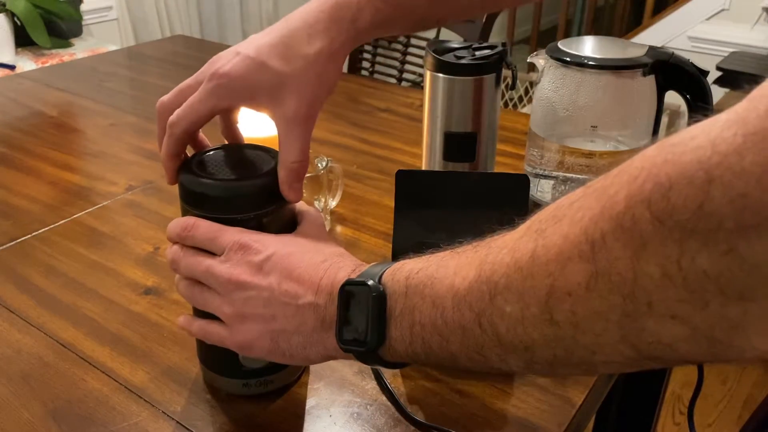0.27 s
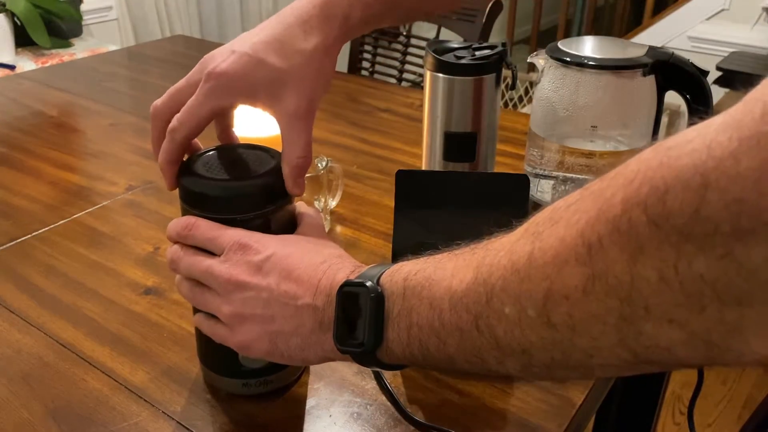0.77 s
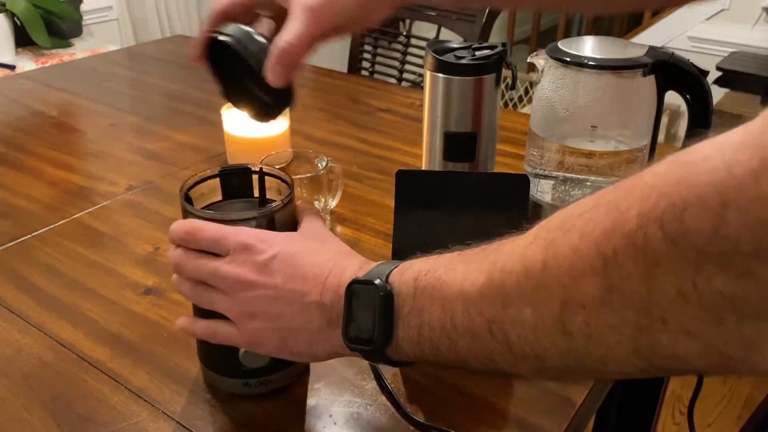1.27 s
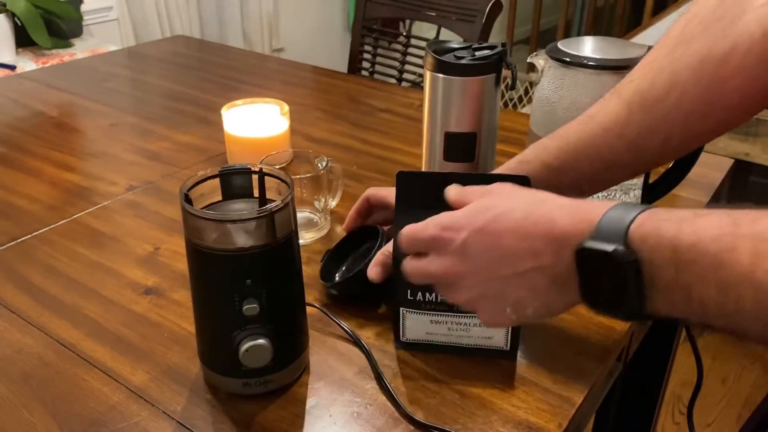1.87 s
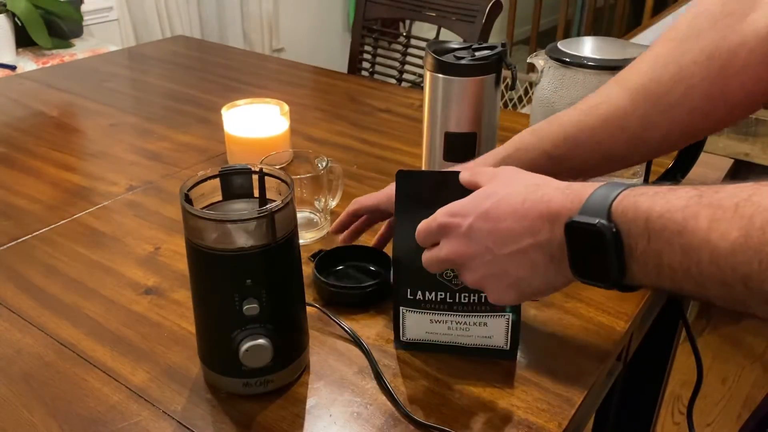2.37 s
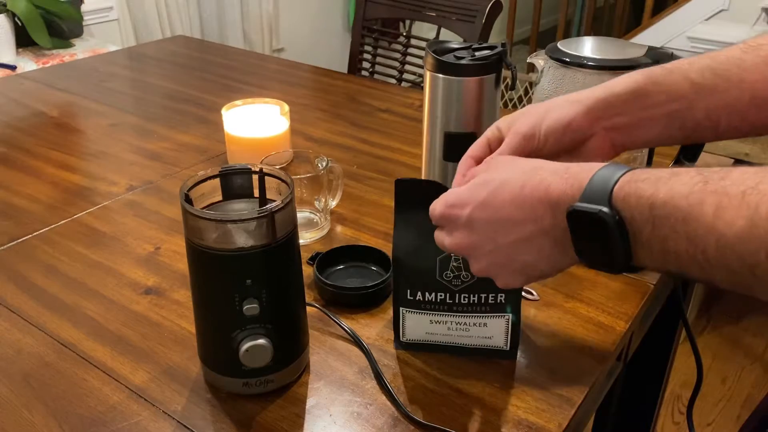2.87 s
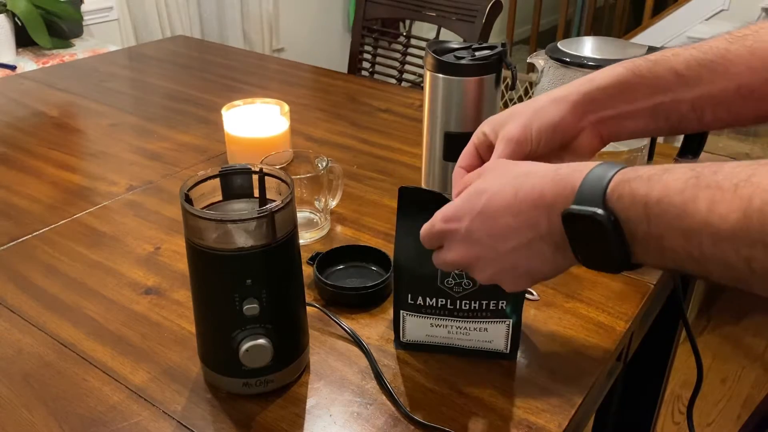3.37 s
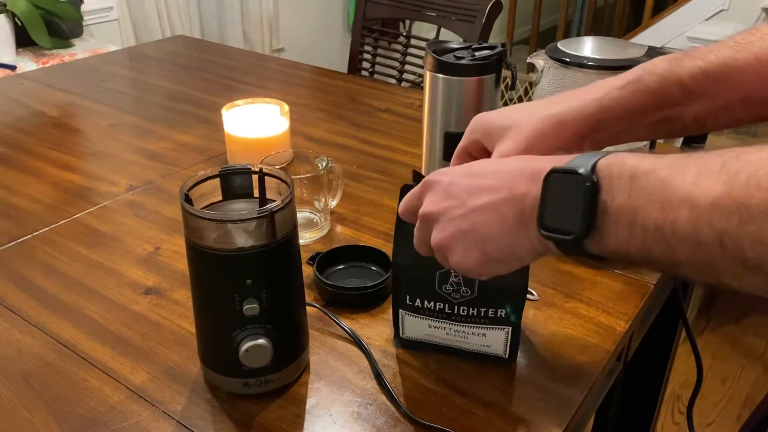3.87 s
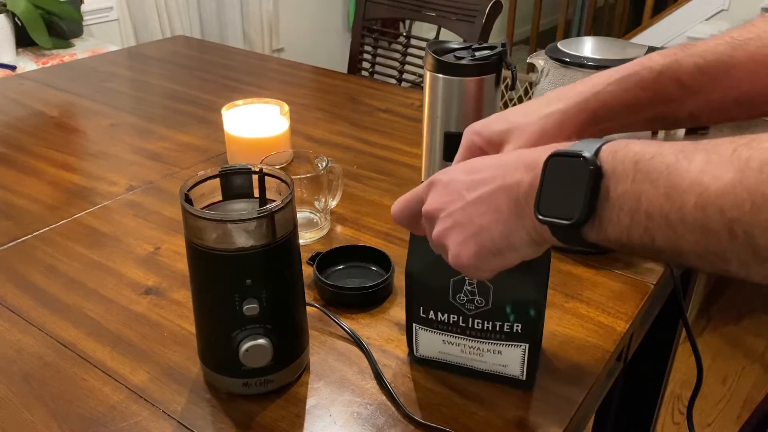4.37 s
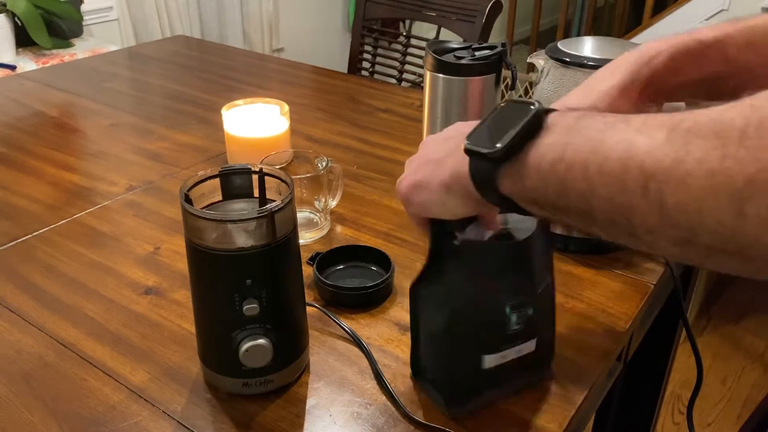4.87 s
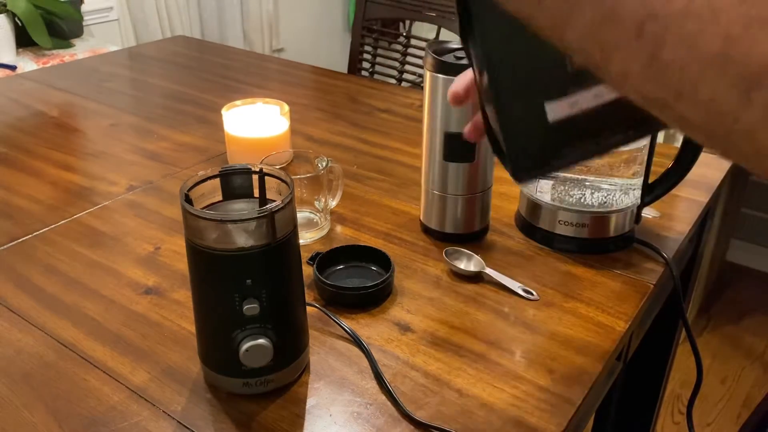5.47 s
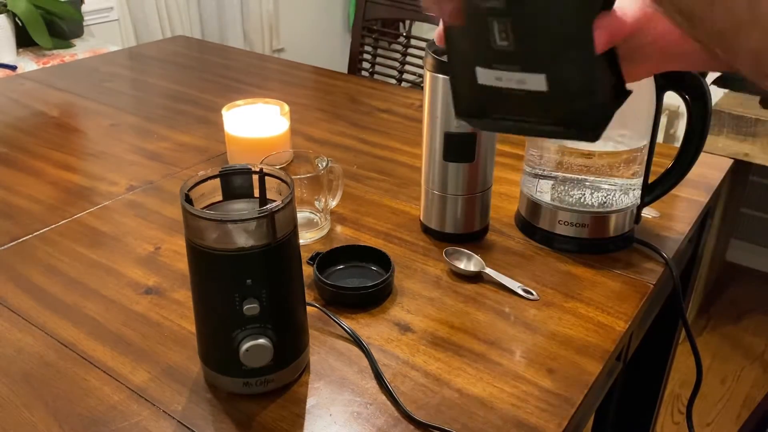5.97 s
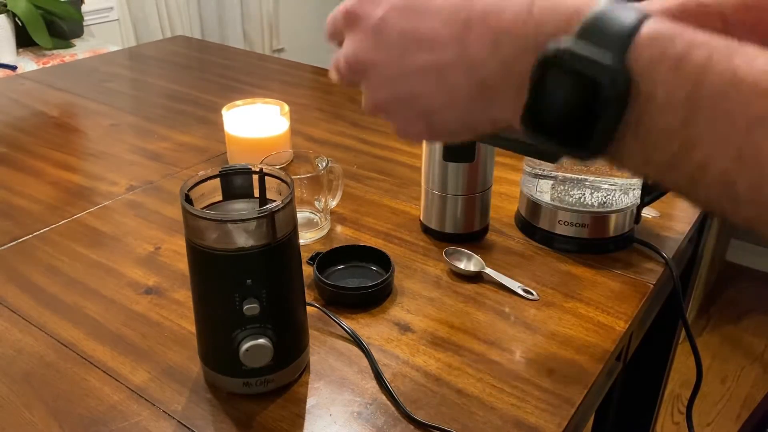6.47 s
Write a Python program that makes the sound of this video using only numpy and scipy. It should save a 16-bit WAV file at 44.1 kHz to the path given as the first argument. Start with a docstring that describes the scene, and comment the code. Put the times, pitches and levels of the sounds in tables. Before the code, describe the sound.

Plastic lid rubbing, popping off and sliding on a table, followed by a crackling foil bag with coffee beans shifting inside.

```python
"""Grinder lid and coffee beans

At a wooden table, the plastic lid of a coffee grinder rubs in its rim and clicks free. It is set down
with a clack and slid aside, sticking and slipping. A foil bag of coffee beans is opened and lifted:
its creases rustle and its panels buckle with sharp snaps while the beans shift inside.
A small kitchen echoes each sound, over a low appliance hum."""
import sys
import numpy as np
from scipy import signal
from scipy.fft import rfft, irfft, next_fast_len
from scipy.io import wavfile
from scipy.ndimage import uniform_filter1d, map_coordinates

SR = 44100
rng = np.random.default_rng(int(sys.argv[2]) if len(sys.argv) > 2 else 0)


def store_wav(level_fs):
    """Save 16-bit WAV to argv[1]."""
    pcm = np.round(np.clip(np.atleast_2d(level_fs), -1, 1) * 32767)
    wavfile.write(sys.argv[1], SR, pcm.T.astype(np.int16))


N = 296793

# Levels in the tables are relative: the functions scale them further.
# A "colour" is the balance of low and high notes. Each row: frequency in Hz, level in dB.
RUMBLE_COLOUR = [(20, -33.5), (40, -14), (65, -1.5), (95, -11.5), (200, -17.5), (300, -23), (550, -33.5),
                 (1400, -49.5), (16000, -66.5)]
RUB_COLOUR = [(150, -15), (400, 0.5), (1000, 8.5), (1800, 0), (3200, -4.5), (6500, -5), (10000, -9),
              (14500, -9)]
THUD_COLOUR = [(60, -17), (300, 5.5), (560, 7.5), (950, -2), (3000, -36.5)]  # a snap's hollow thud
BODY_COLOUR = [(150, -40.5), (500, -12), (1250, -3.5), (2800, -7), (6000, -21.5), (15000, -48.5)]  # the panel that snaps
SIZZLE_COLOUR = [(500, -33.5), (1250, -10.5), (3100, 0), (7000, -3.5), (15000, -11.5)]  # the crease of a snap
SLIDE_COLOUR = [(100, -11.5), (290, -3.5), (370, 3.5), (700, 3), (1100, -1.5), (1600, -6), (2100, -8),
                (2500, -23), (4000, -17.5), (7000, -35), (14000, -46.5)]
FOIL_COLOUR = [(150, -16), (400, -5), (1100, -11.5), (2500, 4), (6000, -1.5), (9000, -1.5), (12500, -8.5),
               (14500, -2)]
BEAN_COLOUR = [(150, -6), (400, -3), (900, -4.5), (1500, -2), (2500, -7.5), (5000, -16.5), (12000, -33)]
ECHO_COLOUR = [(100, -1.5), (400, -5.5), (1200, -0.5), (3000, -3), (6000, -1.5), (10000, -1.5),
               (15000, -11)]
# The appliance's tones. Each row: pitch in Hz, level in dB.
HUM_TONES = [(60, -63), (150, -67.5), (205, -69)]
# The lid rubbing in the rim, one list for each stroke. Each row: time in seconds, level in dB.
RUB_STROKES = [
    [(0, -56.5), (.05, -66.5), (.135, -64)],
    [(.358, -57), (.39, -71), (.48, -61), (.507, -65)],
    [(.6, -67.5), (.636, -82.5)],
    [(.715, -65), (.809, -51)],
    [(1.366, -73), (1.412, -68)],
    [(2.06, -68), (2.09, -59.5), (2.27, -71)],
]
# Notes the lid boosts. Each row: frequency in Hz, width in Hz, boost in dB.
EDGE_PEAKS = [(2950, 300, 5), (3650, 220, 7), (4480, 220, 11), (5850, 240, 8)]  # at its edge
SLIDE_PEAKS = [(386, 31, 5.5), (810, 70, 4.5), (1140, 35, 7.5), (1543, 28, 7), (1995, 130, 7.5)]  # lying on the wood
# Snaps. Each row: start in seconds, level in dB, ring in Hz, thud and sizzle in dB against the body.
LID_CLICKS = [(0.8093, -29.5, 6260, -19.5, -3), (1.0292, -62.5, 4540, 0, 11), (2.089, -52.5, 1400, -14, -6),
              (2.099, -46.5, 1450, -27, -9)]  # the lid leaves the rim and fingers touch it
BAG_SNAPS = [(2.7532, -49, 1800, -14, -7), (2.8414, -48.5, 477, 3.5, 1.5), (3.2637, -45, 296, 7, -20),
             (3.3324, -32.5, 2900, -6, -15), (3.4056, -46.5, 1910, 2, 2), (3.4622, -47, 2230, 2, -5),
             (3.6762, -31.5, 2430, -5, -2.5), (3.7034, -36.5, 388, 3, -15), (3.7259, -34, 556, -7, -16),
             (3.7813, -35, 1500, -32.5, -39), (3.7949, -27, 3040, -8.5, -3.5),
             (3.8472, -31.5, 1660, -1.5, -5), (3.8612, -25.5, 1370, -4.5, 3.5), (3.9048, -31, 3200, 4, -15),
             (4.1385, -32, 3530, -21, -7), (4.145, -28, 1400, 0.5, -10.5),
             (4.4213, -22.5, 1190, -14, -10.5), (4.4494, -27.5, 2550, 0, -1),
             (4.4981, -37.5, 1300, 1.5, -5.5), (4.6925, -37.5, 304, 0, -40), (4.908, -46, 1900, -1, -28),
             (5.2178, -30.5, 1710, -24, -1), (5.3132, -46.5, 1180, -19, -29),
             (5.3845, -41.5, 2600, -12, -6), (5.3905, -36.5, 1560, -13, -13),
             (5.6264, -32.5, 1510, -7, -19), (5.6496, -28.5, 1620, -1.5, -14.5),
             (5.6847, -28, 1540, -3.5, -3), (5.7458, -32.5, 1890, -8, -2.5), (5.7859, -30, 1970, 3.5, 1),
             (5.9107, -40.5, 900, -3, -23), (6.1215, -34.5, 1640, -25, -23), (6.1583, -32, 2420, -2, -2),
             (6.1709, -23.5, 5600, -4, 2.5), (6.3133, -38, 1580, -21, -13.5), (6.5425, -35, 1650, -3.5, -9)]  # panels of the bag buckle
# The lid's notes, alone and on the table. Each row: pitch in Hz, level in dB, seconds to fade by 60 dB.
LID_NOTES = [(140, -16, .16), (365, -21, .3), (410, 4, .05), (465, -2, .08), (750, -15, .5), (840, -5, .1),
             (1112, 4, .085), (3500, -12, .025), (4540, -39, .42), (6410, -23, .13), (14170, -31, .11)]
# The lid landing and rocking. Each row: start in seconds, strength in dB.
LID_BLOWS = [(1.7762, -21), (1.7794, -15.5), (1.7977, -28), (1.803, -28), (1.886, -35.5)]
# The push on the sliding lid. Each row: time in seconds, force in dB.
LID_PUSH = [(2.272, -40), (2.345, -31), (2.46, -37), (2.54, -31.5), (2.61, -48)]
# Five hand movements: feel for the seal, grip it, pull it open, lift the bag, change grip.
# Each row: time in seconds, foil rustle in dB, bean shifting in dB.
HAND_MOVES = [
    [(2.69, -63.5, -52), (2.8, -64, -69), (2.97, -61.5, -101), (3.005, -78, -97.5), (3.033, -51, -88),
     (3.07, -68.5, -86), (3.18, -60.5, -71.5), (3.23, -80, -59)],
    [(3.275, -54.5, -62), (3.32, -59, -65), (3.5, -59.5, -62), (3.53, -61.5, -83), (3.63, -62.5, -85)],
    [(3.68, -68, -51), (3.9, -56.5, -103), (4.13, -58.5, -56), (4.22, -55, -64.5), (4.42, -83, -53),
     (4.55, -61.5, -58), (4.76, -57, -57.5), (4.87, -54.5, -59), (4.945, -75, -87)],
    [(5.085, -61.5, -61.5), (5.16, -73.5, -83.5), (5.21, -51, -48.5), (5.3, -81, -57.5), (5.385, -53, -64),
     (5.47, -68, -57.5), (5.55, -66, -49.5), (5.66, -50, -49.5), (5.87, -55.5, -52)],
    [(6.0, -61, -46.5), (6.05, -53, -53.5), (6.25, -76, -45.5), (6.35, -56.5, -59), (6.53, -81, -62)],
]
# The bag's base hitting the table. Each row: start in seconds, level in dB, pitch in Hz.
BAG_BUMPS = [(3.221, -40.5, 316), (4.192, -31.5, 164), (4.21, -39, 57), (4.257, -33, 430),
             (4.35, -38.5, 520)]
# How long the kitchen rings. Each row: frequency in Hz, seconds to fade by 60 dB.
ECHO_FADE = [(150, 0.86), (500, 0.6), (1200, 0.53), (3000, 0.45), (6000, 0.34), (10000, 0.28),
             (15000, 0.015)]
# How alike room sound is on the left and right. Each row: frequency in Hz, likeness (1 is the same).
STEREO_LIKENESS = [(60, 1), (200, 0.8), (500, 0.072), (1200, 0.023), (3000, 0.088), (7000, 0.44)]
# Frequencies in Hz. From each to the next, the right side's treble shifts by half a cycle more.
PHASE_TURNS_HZ = [7000, 8500, 10100, 12300, 14100, 16500]


def amp(db):
    """Turn decibels into a gain to multiply by."""
    return 10 ** (np.asarray(db) / 20)


def unit(x):
    """Scale x to an average (rms) level of 1."""
    return x / np.sqrt(np.mean(x ** 2) + 1e-20)


def along(points, hz):
    """Read between (Hz, value) points on a pitch scale."""
    freqs, values = np.transpose(points)
    return np.interp(np.log(hz + 1), np.log(freqs + 1), values)


def level(rows):
    """A gain for each sample from (seconds, dB) rows, silent outside them."""
    s, db = np.reshape(rows, (-1, 2)).T
    return amp(np.interp(np.arange(N) / SR, s, db, left=-120, right=-120))


def movements(curves, edge_s):
    """Add up the level curves of hand movements, each easing in and out."""
    width = max(round(edge_s * SR), 1)
    return uniform_filter1d(uniform_filter1d(sum(level(curve) for curve in curves), width), width)


def wobble(rate):
    """A smooth random curve with `rate` new values a second."""
    return map_coordinates(rng.standard_normal(int(N * rate / SR) + 4), [np.arange(N) * rate / SR])


def filtered(x, response):
    """Multiply each frequency in x by response(hz)."""
    size = next_fast_len(N + SR // 2)
    return irfft(rfft(x, size) * response(np.fft.rfftfreq(size, 1 / SR)), size)[..., :N]


def coloured(x, points):
    """Give x a colour, at level 1."""
    return unit(filtered(x, lambda hz: amp(along(points, hz))))


def resonant(x, peaks):
    """Boost the notes at which an object likes to ring."""
    def response(hz):
        return 1 + sum((amp(db) - 1) / (1 + 2j * (hz - f) / width) for f, width, db in peaks)
    return unit(filtered(x, response))


def shifting(x, depth_db):
    """Keep changing the colour of x, as when the point of contact moves."""
    spectra = signal.stft(x, nperseg=256)[2]
    drift = uniform_filter1d(rng.standard_normal(spectra.shape), size=10, axis=0)
    drift = unit(uniform_filter1d(drift, size=10, axis=1))
    return unit(signal.istft(spectra * amp(depth_db * drift), nperseg=256)[1][:N])


def causal(gain):
    """A filter with this gain that starts at once and then rings out."""
    cepstrum = irfft(np.log(gain + 1e-6))
    half = len(cepstrum) // 2
    cepstrum[1:half] *= 2
    cepstrum[half + 1:] = 0
    return np.exp(rfft(cepstrum))


def add(track, s, sound):
    """Mix a sound in, starting at s seconds."""
    part = track[..., round(s * SR):][..., :sound.shape[-1]]
    part += sound[..., :part.shape[-1]]


def grains(rate, spread_db):
    """Tiny random ticks of uneven size, about `rate` a second."""
    size = amp(spread_db * np.minimum(rng.exponential(size=N), 3))
    return unit((rng.random(N) < rate / SR) * size * rng.choice([-1, 1], N))


def diffuse(pair, hz):
    """Blend two unrelated spectra into left and right, alike in the bass."""
    turn = np.arccos(np.clip(along(STEREO_LIKENESS, hz), -1, 1)) / 2
    mid, side = pair[0] * np.cos(turn), pair[1] * np.sin(turn)
    return np.array([mid + side, mid - side])


def rumble_and_hum():
    """Low room rumble and a slightly unsteady appliance hum."""
    t, hz = np.arange(N) / SR, np.fft.rfftfreq(N, 1 / SR)
    noise = diffuse(rfft(rng.standard_normal((2, N))), hz)
    rumble = unit(irfft(noise * amp(along(RUMBLE_COLOUR, hz)), N))
    hum = sum(amp(db + 2.1 * wobble(4.5)) * np.sqrt(2) * np.sin(2 * np.pi * f * t + .5 * wobble(4.1))
              for f, db in HUM_TONES)
    return amp(-53.5) * rumble + hum


def lid_rub():
    """The lid scrapes round in the rim, and its edge rings."""
    ticks = shifting(grains(rate=4200, spread_db=3), depth_db=3)
    scrape = coloured(resonant(ticks, EDGE_PEAKS), RUB_COLOUR)
    return amp(0.96 * wobble(53)) * movements(RUB_STROKES, edge_s=0.013) * scrape


def lid_drag():
    """The lid drags out of the rim with a hollow scrape and a short rising squeak."""
    colour = [(50, -14.5), (110, -2.5), (300, -7.5), (700, -8), (1100, -5.5), (2500, -27), (8000, -31.5)]
    hollow = coloured(grains(rate=2000, spread_db=1.5), colour)
    squeak_hz = np.interp(np.arange(N) / SR, [.775, .815], [430, 760]) * (1 + 0.089 * wobble(300))
    squeak = np.sin(2 * np.pi * np.cumsum(squeak_hz) / SR)
    return (hollow + squeak) * level([(.73, -67), (.775, -60), (.803, -40), (.815, -36.5), (.84, -60.5)])


def snaps(rows, slip_s, ring_db, sharpness, size=4096):
    """Each snap is a quick burst of tiny slips, coloured by the panel that gives way."""
    out, t, hz = np.zeros(N), np.arange(size) / SR, np.fft.rfftfreq(size, 1 / SR)
    thud, body, sizzle = (amp(along(colour, hz)) for colour in (THUD_COLOUR, BODY_COLOUR, SIZZLE_COLOUR))
    bend = np.exp(-2j * np.pi * 0.9 * np.log1p(hz / 100))  # bending waves bring low notes later
    slips = np.exp(-(t / slip_s) ** 2) * (1 - np.exp(-t / 0.002))
    for s, db, ring_hz, thud_db, sizzle_db in rows:
        burst = rfft(rng.standard_normal(size) * slips)
        burst /= np.sqrt(abs(uniform_filter1d(abs(burst) ** 2, size=30)) + 1e-12)  # even out its colour
        echo_s = 0.00147 * np.exp(0.22 * rng.normal())  # round trip through the air behind the panel
        hollow = body / abs(1 - 0.35 * np.exp(-2j * np.pi * hz * echo_s))  # 35% comes back
        panel = np.sqrt((amp(thud_db) * thud) ** 2 + hollow ** 2 + (amp(sizzle_db) * sizzle) ** 2)
        ring = 1 + amp(ring_db) / np.sqrt(1 + (2 * sharpness * (hz / ring_hz - 1)) ** 2)
        snap = irfft(burst * bend * causal(panel * ring))
        add(out, s, amp(db) * snap * np.sqrt(.006 * SR / np.sum(snap ** 2)))  # level as if 6 ms long
    return out


def lid_ring():
    """The lid's fading notes after one soft plastic contact."""
    t = np.arange(SR // 2) / SR
    swell = 1 - np.exp(-(t / .0007) ** 2)
    return swell * sum(amp(db - 60 * t / fade_s) * np.sin(2 * np.pi * hz * t) * (-1) ** k
                       for k, (hz, db, fade_s) in enumerate(LID_NOTES))


def lid_clicks():
    """The lid clicks free and is touched by fingers, ringing faintly each time."""
    clicks = snaps(LID_CLICKS, slip_s=0.0031, ring_db=9, sharpness=3.3)
    for s, db, *_ in LID_CLICKS:
        add(clicks, s, amp(0.5 * db - 33) * lid_ring())  # a firm grip damps the harder clicks
    return clicks


def lid_down():
    """The lid lands edge first and rocks to rest; the table answers each blow with a short clack."""
    rings, clacks, cracks = np.zeros((3, N))
    t = np.arange(SR // 2) / SR
    for s, db in LID_BLOWS:
        add(rings, s, amp(db - 11.5) * lid_ring())
        add(cracks, s, amp(2 * db - 3.5 - 60 * t / 0.0089))  # only hard blows crack brightly
        add(clacks, s, amp(1.18 * db - 1 - 60 * t / 0.025))  # soft blows leave mostly the ring
    bright = coloured(rng.standard_normal(N),
                      [(1000, 9.5), (2300, -3), (3800, 4), (7000, -10), (9000, -8.5), (15000, -16)])
    woody = coloured(rng.standard_normal(N), [(80, -21), (230, -6), (420, 3), (1050, 6.5), (1600, 2),
                                              (2200, -9), (4000, -27), (15000, -52)])
    return rings + cracks * bright + clacks * woody


def lid_slide(start_s=2.294, first_gap_s=0.0485, shrink=.935):
    """The pushed lid sticks and slips in ever faster judders; its edge chatters on the wood grain."""
    t = np.arange(N) / SR
    times = start_s + np.append(0, np.cumsum(first_gap_s * shrink ** np.arange(6)))
    judders = sum(np.exp(-((t - s) / 0.01) ** 2) for s in times)
    push = level(LID_PUSH) * np.sqrt(judders + amp(-20))
    slips = coloured(resonant(grains(rate=2200, spread_db=2.5), SLIDE_PEAKS), SLIDE_COLOUR)
    chatter = coloured(resonant(grains(rate=220, spread_db=6), EDGE_PEAKS), RUB_COLOUR)
    return push * (slips + amp(-17) * chatter)


def foil_rustle():
    """Creases in the foil crackle finely under the hands."""
    hands = movements([[(s, db) for s, db, _ in move] for move in HAND_MOVES], edge_s=0.011)
    fine = shifting(grains(rate=3200, spread_db=1), depth_db=3)
    coarse = amp(-7.5) * grains(rate=66, spread_db=5.5)
    return hands * amp(2.4 * wobble(22)) * coloured(fine + coarse, FOIL_COLOUR)


def crinkles(spread_db, count, typical_hz=1400):
    """Small panels buckle at random; a smaller one rings higher, thuds less and sizzles more."""
    chance = rng.standard_normal((count, 2))
    times = (np.arange(count) + rng.random(count)) * N / SR / count
    db, octaves = spread_db * np.clip(chance[:, 0], -2, 1), .75 * chance[:, 1]
    thud_db, sizzle_db = -9 * octaves - 3.5, 6.5 * octaves - 13
    rows = zip(times, db, typical_hz * 2 ** octaves, thud_db, sizzle_db)
    return unit(snaps(rows, slip_s=0.0039, ring_db=16, sharpness=15))


def beans_shift():
    """Beans tick against each other, and their moving weight dents the bag's walls."""
    shake = movements([[(s, db) for s, _, db in move] for move in HAND_MOVES], edge_s=0.029)
    surges = amp(-1 + 4.34 * wobble(35))
    beans = coloured(shifting(grains(rate=900, spread_db=0.5), depth_db=3), BEAN_COLOUR)
    walls = amp(-6.5) * crinkles(spread_db=5.5, count=170)
    return shake * (surges * beans + walls)


def bag_snaps():
    """Panels of the bag buckle with sharp snaps."""
    return snaps(BAG_SNAPS, slip_s=0.0028, ring_db=7.5, sharpness=5.6)


def bag_bumps():
    """The bag's base bumps the table; each low note fades by 5.2 dB a cycle."""
    bumps, t = np.zeros(N), np.arange(SR // 2) / SR
    swell = 1 - np.exp(-t / 0.00082)
    for s, db, hz in BAG_BUMPS:
        add(bumps, s, amp(db - 5.2 * hz * t) * np.sin(2 * np.pi * hz * t) * swell)
    return bumps


def kitchen_echo(x, delay_s, size=8192):
    """The room's fading echo, a little different for each moment as the hands move."""
    out = np.zeros((2, N))
    for start in range(0, N - size // 4, size):
        hz, t, noise = signal.stft(rng.standard_normal((2, SR // 2)), SR, nperseg=256)
        spectra = diffuse(noise, hz[:, None]) * amp(-60 * t / along(ECHO_FADE, hz)[:, None])
        spectra *= 1 + amp(8) * np.exp(-t / 0.054)  # the table and nearby things answer first
        tail = signal.istft(spectra, SR, nperseg=256)[1]
        echo = signal.fftconvolve(x[None, start:start + size], tail / np.linalg.norm(tail[0]), axes=1)
        add(out, start / SR + delay_s, echo)
    return filtered(out, lambda hz: amp(along(ECHO_COLOUR, hz)))


def placed(x, left_db, lead_s):
    """A source to the left is louder and arrives earlier on that side."""
    sides = np.array([[1], [-1]])
    return filtered(x, lambda hz: amp(sides * left_db / 2) * np.exp(1j * np.pi * hz * sides * lead_s))


def scene():
    """Grinder and lid stand a little to the left, the bag near the middle."""
    grinder = lid_rub() + lid_drag() + lid_clicks()
    table = lid_down() + lid_slide()
    bag = foil_rustle() + beans_shift() + bag_snaps() + bag_bumps()
    near = placed(grinder, left_db=5.5, lead_s=3e-5)
    near += placed(table, left_db=3.5, lead_s=4e-5)
    near += placed(bag, left_db=0.5, lead_s=2e-5)
    room = kitchen_echo(amp(-5.5) * grinder + amp(-0.5) * table + amp(-3) * bag, delay_s=.003)
    return near + room * amp([[.6], [-.6]]) + rumble_and_hum()


def record(dry, top_hz=15900):
    """Both sides share the left's high treble, phase-shifted on the right; the very top is cut off."""
    def shared(hz):
        return np.clip((hz - 7200) / 800, 0, 1)

    def turn(hz):
        half_cycles = np.interp(hz, PHASE_TURNS_HZ, np.arange(len(PHASE_TURNS_HZ)))
        return np.exp(-1j * np.pi * half_cycles * np.array([[0], [1]]))

    lows = filtered(dry, lambda hz: 1 - shared(hz))
    highs = filtered(dry[0], lambda hz: shared(hz) * turn(hz))
    return filtered(lows + highs, lambda hz: 1 / np.sqrt(1 + (hz / top_hz) ** 120))


dry = scene()
out = record(dry)
store_wav(out)
```